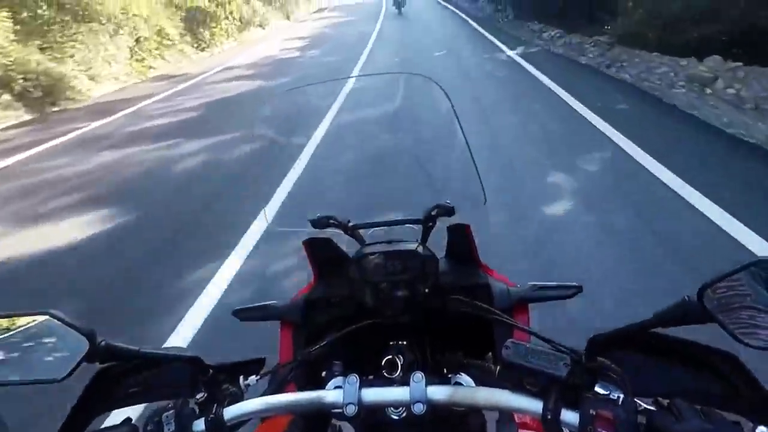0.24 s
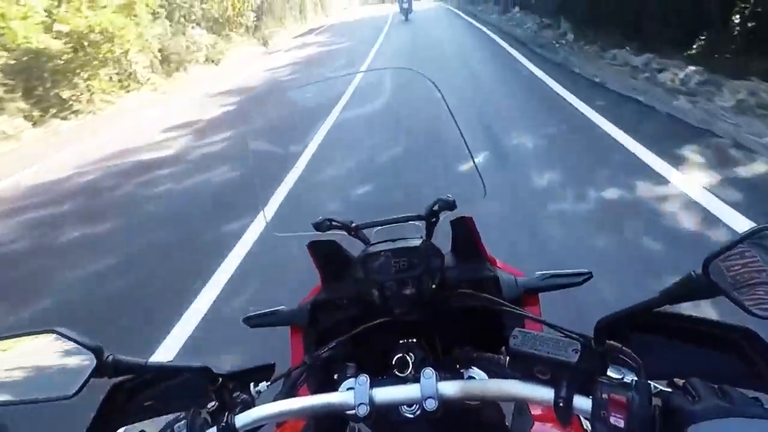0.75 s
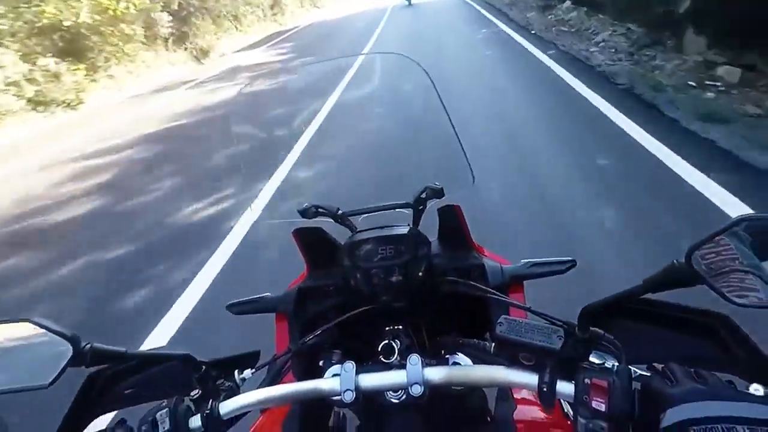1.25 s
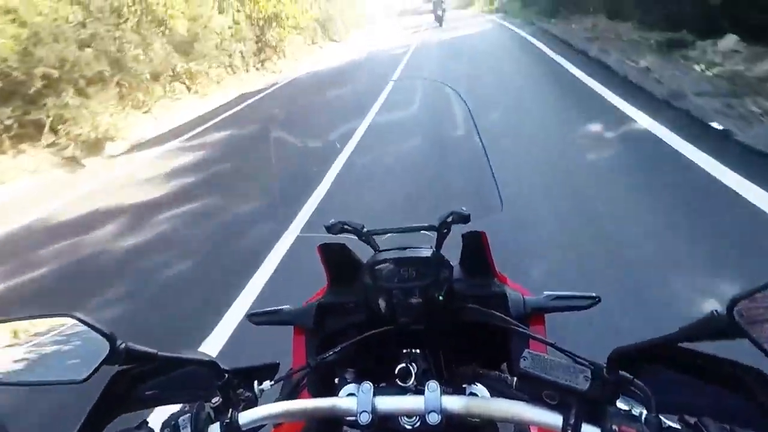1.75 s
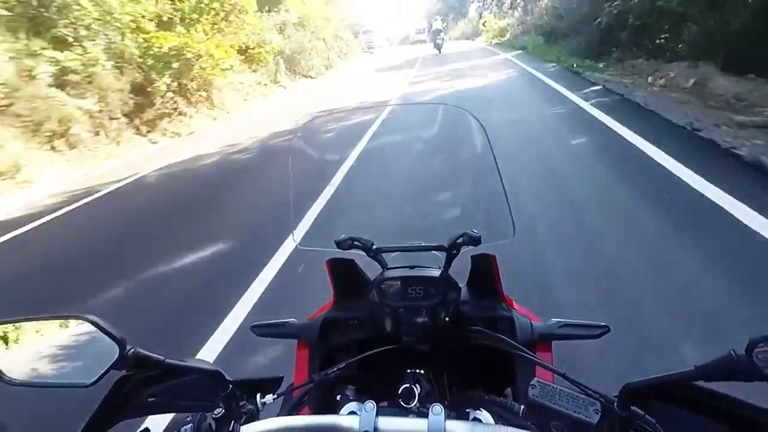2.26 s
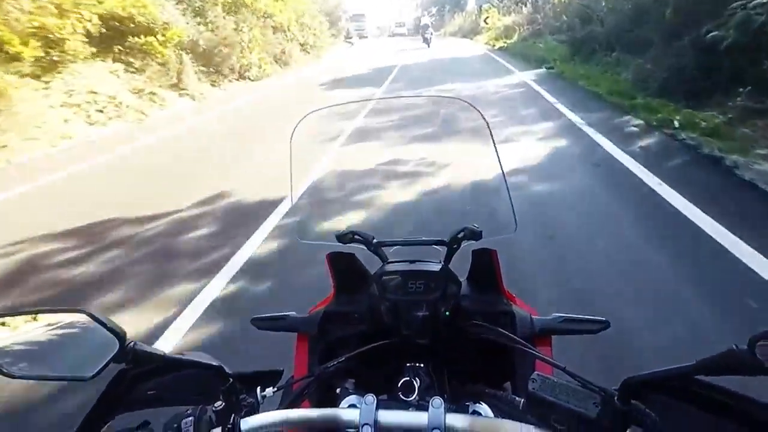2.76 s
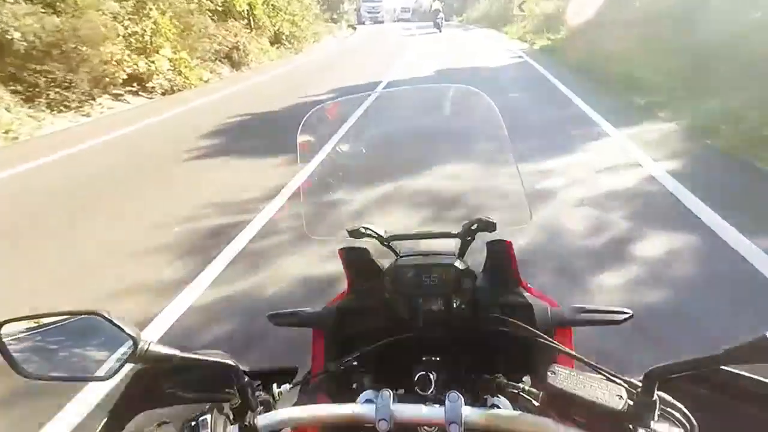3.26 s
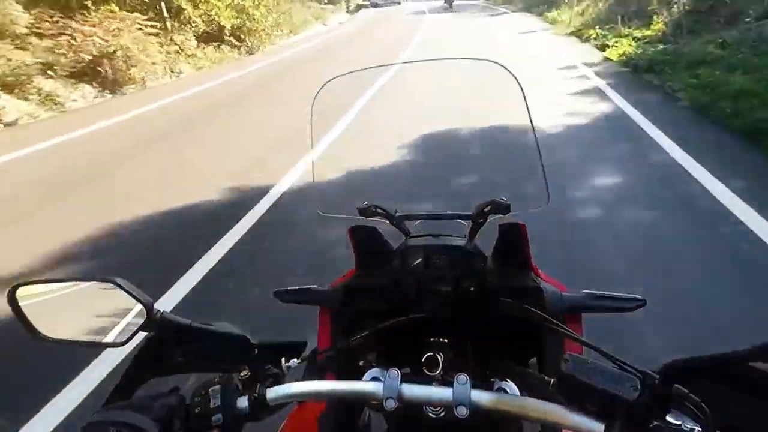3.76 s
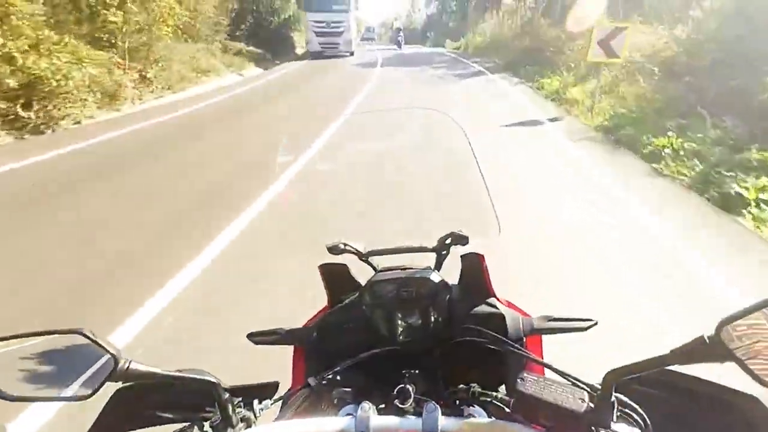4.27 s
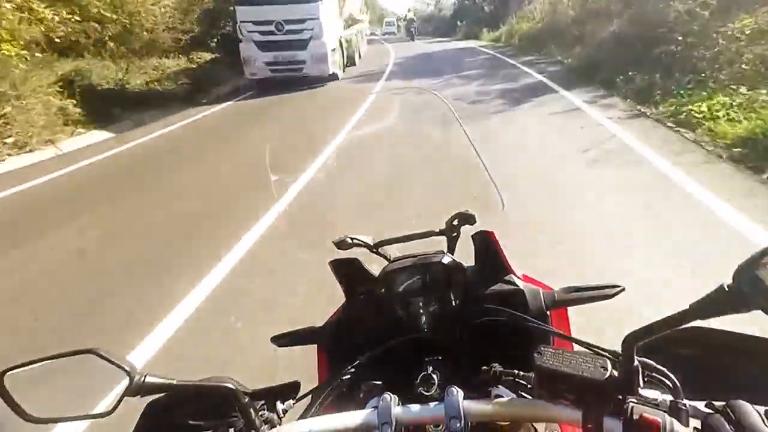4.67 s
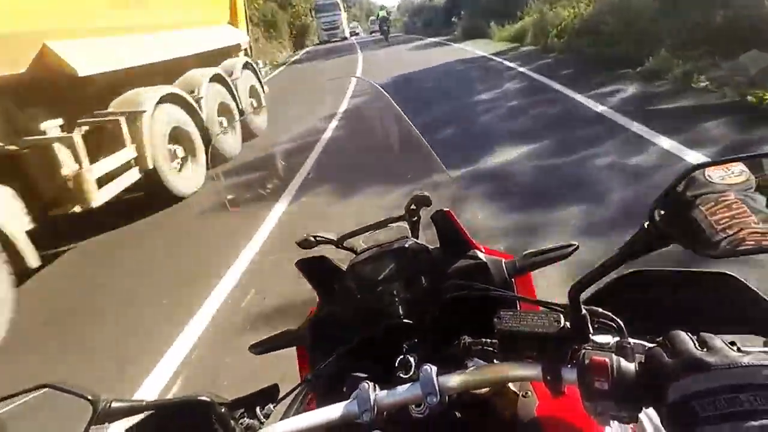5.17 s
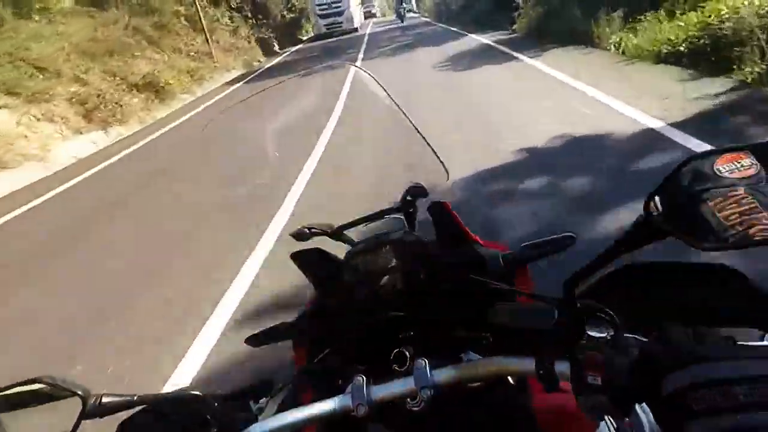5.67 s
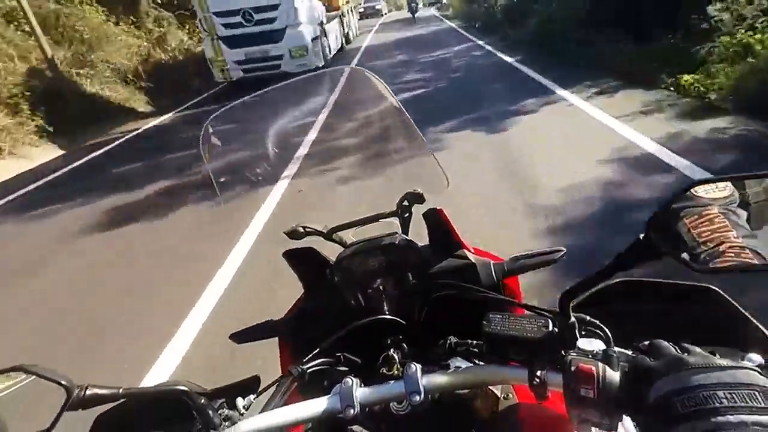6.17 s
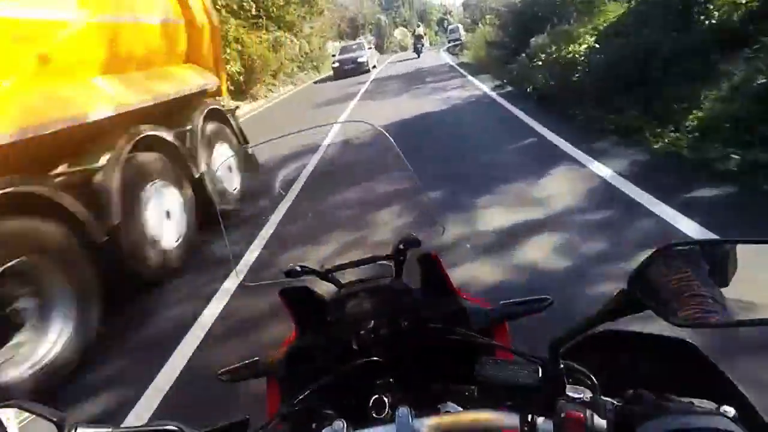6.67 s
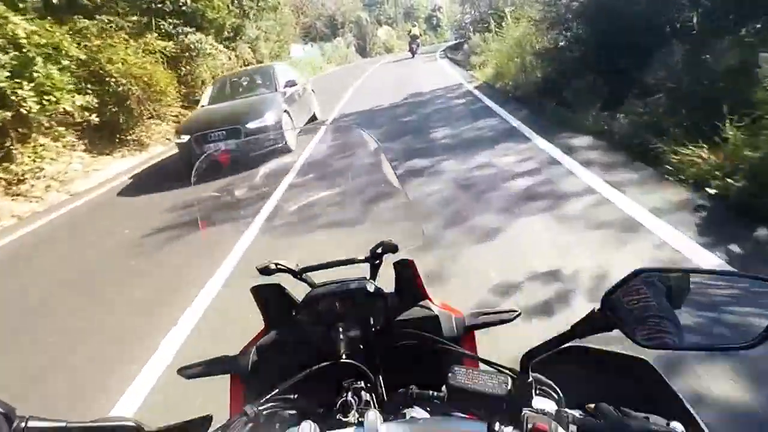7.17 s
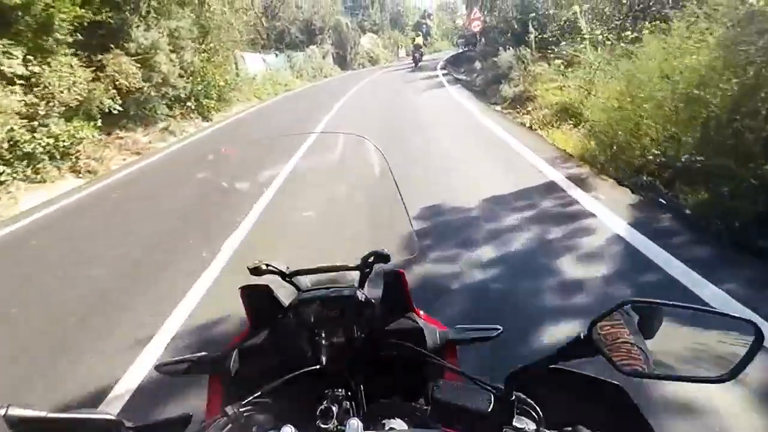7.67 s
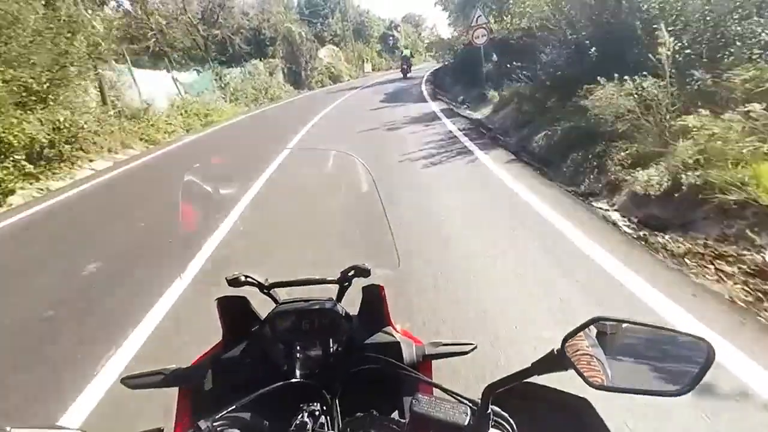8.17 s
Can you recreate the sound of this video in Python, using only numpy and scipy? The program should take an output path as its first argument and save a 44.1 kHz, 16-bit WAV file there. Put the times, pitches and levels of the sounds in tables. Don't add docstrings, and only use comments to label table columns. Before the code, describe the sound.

Low wind buffeting and tyre roar over a lumpy motorcycle engine that accelerates, then eases off as lorries and a car sweep past.

```python
import sys
import numpy as np
from scipy import signal
from scipy.fft import rfft, irfft, next_fast_len
from scipy.io import wavfile
from scipy.ndimage import uniform_filter1d, map_coordinates

SR = 44100
rng = np.random.default_rng(int(sys.argv[2]) if len(sys.argv) > 2 else 0)


def materialize(psi):
    bounded = np.clip(np.atleast_2d(psi).T, -1, 1)
    quanta = np.round(bounded * 32767).astype(np.int16)
    wavfile.write(sys.argv[1], SR, quanta)


def to_linear_factor(level_db):
    exponent = np.asarray(level_db, float) / 20
    return 10 ** exponent


N = 371322


def unit(x):
    return x / np.sqrt(np.mean(x ** 2) + 1e-20)


def along(points, hz):
    f, v = np.transpose(points)
    return np.interp(np.log(hz + 1), np.log(f + 1), v, left=-120, right=-120)


def curves(rows):
    s, *columns = np.transpose(rows)
    return [np.interp(np.arange(N) / SR, s, column) for column in columns]


def wobble(rate, step=1):
    coarse = np.arange(0, N + 32, 32)
    knots = map_coordinates(rng.standard_normal(int(N * rate / SR) + 4), [coarse * rate / SR])
    return np.interp(np.arange(0, N, step), coarse, knots)


def filtered(x, gain):
    m = 2 * next_fast_len(N // 2 + SR // 4)
    cepstrum = irfft(np.log(gain(np.fft.rfftfreq(m, 1 / SR)) + 1e-6), m)
    cepstrum[1:m // 2] *= 2
    cepstrum[m // 2 + 1:] = 0
    return irfft(rfft(x, m) * np.exp(rfft(cepstrum)), m)[..., :N]


def coloured(x, spectrum):
    return unit(filtered(x, lambda hz: to_linear_factor(along(spectrum, hz))))


def patchy(patchy_db):
    z = signal.stft(rng.standard_normal(N + 512), nperseg=512)[2]
    field = uniform_filter1d(rng.standard_normal(z.shape), size=6, axis=0)
    field = uniform_filter1d(field, size=8, axis=1)
    return signal.istft(z * to_linear_factor(patchy_db * unit(field)), nperseg=512)[1][:N]


# (sets in [s], is full [s])
WAKE_S = (4.9, 8)


def swells(rows, lull_db, wake_db):
    step = 64
    t = np.arange(0, N + step, step) / SR
    s, db, half = np.transpose(rows)[:, :, None]
    lull = to_linear_factor(lull_db + wake_db * np.interp(t, WAKE_S, [0, 1]))
    bells = to_linear_factor(db) ** 2 * np.exp(-((t - s) / half) ** 2)
    power = lull ** 2 + bells.sum(0)
    return np.interp(np.arange(N) / SR, t, np.sqrt(power))


# (frequency [Hz], width [Hz], level [dB])
WHINE = (12408, 12, -70)
# (multiple of the cycle, width [Hz], level [dB], cycle rate at onset [Hz], at full [Hz])
GEAR = (170, 40, -54, 27.6, 28.4)


def whine():
    hz, width_hz, db = WHINE
    tone = np.sin(2 * np.pi * hz * np.arange(N) / SR)
    electrics = to_linear_factor(db) * (0.94 + .5 * wobble(width_hz)) * tone
    multiple, width_hz, db, *speeds_hz = GEAR
    cycle_hz = curves(ENGINE)[0]
    mesh = wobble(width_hz) * np.sin(2 * np.pi * multiple * np.cumsum(cycle_hz) / SR)
    return electrics + to_linear_factor(db) * np.interp(cycle_hz, speeds_hz, [0, 1]) * mesh


# (time [s], peak level [dB], half length [s])
LUMPS = [(0.055, -30.2, 0.21), (0.302, -35, 0.073), (1.001, -31, 0.037), (1.179, -31.5, 0.077),
         (1.369, -25, 0.054), (1.631, -28, 0.048), (1.787, -30.5, 0.13), (2.269, -25, 0.065),
         (2.601, -31, 0.16), (2.995, -26, 0.072), (3.452, -33, 0.43), (3.579, -31.5, 0.055),
         (4.36, -27.5, 0.065), (4.567, -27, 0.069), (4.843, -28, 0.17), (5.251, -22.5, 0.09),
         (5.626, -21, 0.088), (5.952, -29, 0.028), (6.135, -29.0, 0.29), (6.696, -23.5, 0.038),
         (6.861, -24.5, 0.26), (7.395, -25.5, 0.13), (7.851, -20.5, 0.16), (8.461, -23, 0.18)]


def frame_lumps():
    return swells(LUMPS, lull_db=-40.5, wake_db=4)


# (time [s], level [dB])
ROAD = [(0, -39.5), (.63, -40), (1.36, -38.5), (2.3, -40.5), (3.33, -38.5), (3.75, -38), (4.48, -35.5),
        (5.3, -32), (5.63, -33), (6.12, -35.5), (6.45, -38), (6.94, -34.5), (7.08, -34.5), (7.2, -37),
        (7.5, -37), (7.9, -36.5), (8.11, -39.5), (8.42, -38.5)]
# (frequency [Hz], density [dB per Hz])
TYRES = [(160, -24), (280, -9), (388, -7), (585, -8.5), (705, -10), (818, -4.5), (1100, -7.5), (1530, -5.5),
         (1790, -4.5), (2600, -14), (3380, -34), (5720, -120)]
CLATTER = [(1500, -35), (2200, -5.5), (3000, -5), (3700, -4.5), (4000, -14), (5000, -12.5), (6500, -22),
           (7500, -12.5), (8500, -24.5), (10000, -27), (13000, -29), (15500, -39)]
BODY = [(80, 0), (120, 1), (170, -5), (250, -8), (300, -16), (400, -41)]


def road(throb, lumps):
    tyre_db, = curves(ROAD)
    throttle = curves(ENGINE)[1]
    clatter_db = tyre_db - 2 + 0.5 * throttle
    shake_db = uniform_filter1d(20 * np.log10(lumps), int(0.41 * SR))
    drum_db = -38 + shake_db - shake_db.mean()
    tyre_level = to_linear_factor(tyre_db - 0.67 + 1.37 * throb + 0.79 * wobble(14))
    tyres = tyre_level * coloured(patchy(patchy_db=0.5), TYRES)
    clatter_level = to_linear_factor(clatter_db + 1.08 * throb + 0.072 * wobble(16))
    clatter = clatter_level * coloured(patchy(patchy_db=0.75), CLATTER)
    drumming = to_linear_factor(drum_db + 0.85 * wobble(5.1)) * coloured(rng.standard_normal(N), BODY)
    return tyres + clatter + drumming


# (time [s], peak level [dB], half length [s])
EDDIES = [(-0.002, -12.5, 0.1), (0.317, -23, 0.11), (0.436, -17.5, 0.037), (0.711, -20.5, 0.096),
          (1.222, -14.5, 0.087), (1.481, -20, 0.25), (1.689, -17.4, 0.041), (1.935, -14, 0.077),
          (2.56, -15.5, 0.024), (2.781, -16, 0.25), (3.035, -15, 0.029), (3.359, -19, 0.027),
          (3.708, -16, 0.21), (3.931, -16.0, 0.053), (4.363, -17, 0.035), (4.576, -13.5, 0.041),
          (4.921, -12.5, 0.15), (5.313, -16.5, 0.048), (5.646, -14.5, 0.077), (5.872, -17, 0.081),
          (6.0, -11.5, 0.034), (6.211, -17.5, 0.309), (6.27, -16, 0.032), (6.557, -15.5, 0.042),
          (6.707, -11.5, 0.025), (6.919, -15, 0.064), (7.073, -13.7, 0.06), (7.203, -11, 0.029),
          (7.466, -18.5, 0.2), (8.048, -15, 0.17)]
# (frequency [Hz], density [dB per Hz])
THUD = [(8, -12.5), (20, -12.5), (30, -6), (41, 1.5), (52, -7.5), (65, -16.5), (85, -30), (120, -57)]
RUMBLE = [(50, -8), (70, 3.5), (100, 1.5), (130, -25.5), (170, -17), (250, -28)]


def buffet(lumps):
    thud = coloured(rng.standard_normal(N), THUD)
    thud = thud / (np.abs(signal.hilbert(thud, next_fast_len(N))[:N]) + .5)
    thud = unit(filtered(thud, lambda hz: 1 / (1 + (hz / 75) ** 4)))
    rumble = unit(to_linear_factor(1.6 * wobble(11)) * coloured(rng.standard_normal(N), RUMBLE))
    eddies = swells(EDDIES, lull_db=-26, wake_db=2.5)
    return to_linear_factor(0.64) * eddies * thud + to_linear_factor(0.4) * lumps * rumble


# (time [s], peak level [dB], half length [s])
GUSTS = [(-0.1, -26, 0.096), (0.248, -32, 0.023), (0.333, -29.5, 0.017), (1.21, -35, 0.041),
         (1.839, -34.5, 0.02), (2.25, -37.5, 0.04), (2.604, -32.5, 0.022), (2.705, -31, 0.031),
         (3.025, -34.5, 0.044), (3.692, -36, 0.014), (4.19, -41.5, 0.187), (4.351, -32, 0.027),
         (4.917, -32, 0.19), (5.269, -31, 0.069), (5.611, -30.7, 0.096), (5.936, -32, 0.019),
         (5.984, -38, 0.018), (6.018, -31.5, 0.62), (6.075, -28, 0.015), (6.333, -48, 0.056),
         (6.535, -38, 0.0095), (6.741, -19, 0.011), (6.9, -31.5, 0.03), (7.061, -22, 0.12),
         (7.121, -19.5, 0.018), (7.297, -25, 0.081), (7.636, -28, 0.059), (7.936, -26, 0.17),
         (8.331, -28.5, 0.02), (8.404, -32, 0.015)]
# (time [s], peak level
# [dB])
BURSTS = [(0.3292, -19), (1.1742, -18), (1.3134, -20.5), (1.3554, -20.5), (1.8143, -20), (2.2052, -19),
          (2.602, -21), (2.9103, -19), (3.016, -22), (3.0719, -19.5), (3.6875, -18.5), (3.7414, -23),
          (4.152, -20.5), (4.1909, -20.5), (4.35, -16), (4.5072, -16.5), (4.5461, -22), (4.6641, -20),
          (4.7873, -15.5), (4.832, -11.5), (4.907, -13.5), (4.9451, -13), (5.0373, -15),
                  (5.278, -14.5), (5.3655, -18), (5.5429, -14), (5.8488, -15.5), (5.9112, -11.5),
                  (5.955, -12), (5.9825, -3), (6.0059, -13), (6.144, -13), (6.1879, -14), (6.3128, -12),
                  (6.3571, -14), (6.4856, -17.5), (6.533, -10.5), (6.7367, -8), (6.7801, -14),
                  (6.831, -18.5), (6.8657, -14),
          (6.8657, -14.5), (6.9368, -10), (6.9646, -13), (7.0458, -9.5), (7.0965, -10), (7.1756, -9),
               (7.1985, -11.5), (7.2444, -10.5), (7.2633, -8.5), (7.3153, -12.5), (7.347, -9.5),
               (7.4074, -18), (7.4974, -14), (7.558, -15), (7.6242, -15), (7.642, -11), (7.7068, -18.5),
               (7.7428, -11.5), (7.893, -13), (7.9498, -9.5), (8.0306, -13), (8.1346, -18.5),
               (8.197, -14.5), (8.2606, -19), (8.2893, -17), (8.318, -11), (8.3332, -7.5), (8.3968, -15)]
# (frequency [Hz], density [dB per Hz])
HISS = [(250, -16), (400, -11), (900, -10.5), (1500, -12.5), (2200, -9.5), (3300, -1), (3750, -2.5),
        (4050, -19), (5000, -23.5), (6500, -25), (8500, -30.5), (12000, -39), (15500, -60)]


def gusts():
    gust = swells(GUSTS, lull_db=-39.5, wake_db=1.5)
    broken = np.clip((20 * np.log10(gust) + 58.0) / 14, .2, 1.1)
    ragged_db = 1.4 * wobble(14) + 1.6 * wobble(45) + 2.2 * wobble(150)
    flutter = to_linear_factor(broken * ragged_db)
    level = to_linear_factor(-0.56) * gust * flutter / np.sqrt(uniform_filter1d(flutter ** 2, size=SR // 6))
    rise_s, fall_s, lead_s, trim_db = .0018, .007, .001, -5.5
    t = np.arange(SR // 20) / SR
    burst = (1 - np.exp(-t / rise_s)) * np.exp(-t / fall_s)
    power = np.pad(level ** 2, (0, len(t)))
    for s, db in BURSTS:
        start = round((s - lead_s) * SR)
        power[start:][:len(t)] += (to_linear_factor(db + trim_db) * burst) ** 2
    air = np.sqrt(power[:N]) * unit(patchy(patchy_db=1))
    return np.sqrt(np.mean(air ** 2)) * coloured(air, HISS)


# (time [s], four-stroke cycle rate [Hz], throttle [0-1], level [dB])
ENGINE = [(0, 24.4, .33, 0), (.2, 24.15, .33, 0), (.84, 24.1, .33, 0), (2, 23.6, .33, 0),
          (2.77, 23.5, .35, 0), (3.37, 23.7, .55, 0), (3.8, 24.2, .67, 0), (4.13, 24.8, .75, 0),
          (4.78, 26.5, .95, 0), (5.3, 27.8, 1, 0), (5.79, 28.95, 1, 0), (5.93, 28.95, 1, 0),
          (5.98, 28.9, 0, 1), (6.4, 28.7, 0, 1), (6.75, 28, 0, 0), (7.1, 26.9, 0, -6), (7.55, 26.45, 0, 0),
          (8.42, 26.1, 0, 0)]
TWIN = (.375, .8)
# (multiple of the cycle, rms with
# throttle shut [dB], cruising [dB], opening [dB], wide [dB])
EXHAUST = [(3, -42, -43, -42, -38), (4, -44, -42, -44, -46), (5, -37, -35, -35, -32),
           (6, -39, -39.5, -38, -34), (7, -46, -56, -51, -47), (8, -40, -40, -42, -39),
           (9, -48, -43, -46, -40), (10, -58, -45, -44, -57), (11, -53, -45, -38, -55)]
INTAKE = [(12, -62, -61, -55, -56), (13, -60, -63, -61, -53), (14, -58, -55, -58, -48),
          (15, -57, -61, -59, -54), (16, -58, -63, -57, -48), (17, -58, -63, -55, -48),
          (18, -60, -63, -58, -50), (19, -57, -54, -48, -47), (20, -60, -60, -58, -47),
          (21, -59, -56, -54, -44), (22, -60, -67, -55, -43), (23, -58, -66, -52, -50),
          (24, -59, -52, -47, -55), (25.5, -64, -54, -55, -60), (27, -66, -66, -61, -60),
          (30, -66, -66, -62, -56), (32, -66, -64, -60, -55)]
# (frequency [Hz], gain [dB])
AIR_BOX = [(50, 0), (300, 0), (380, -1.5), (520, -1), (580, 1), (610, -4), (640, -10), (720, -3),
           (1200, -3)]


def engine():
    step = 16
    cycle_hz, throttle, level_db = [c[::step] for c in curves(ENGINE)]
    turns = np.cumsum(cycle_hz) * step / SR
    delay, size = TWIN
    total = np.zeros(len(turns))
    for k, *states_db in EXHAUST + INTAKE:
        second = size if k < 12 else size / 3
        phase = np.angle(1 + second * np.exp(-2j * np.pi * k * delay)) + .2 * wobble(5, step)
        phase += rng.normal(0, .6) - .01 * np.pi * k ** 2
        partial_db = np.interp(throttle, np.linspace(0, 1, 4), states_db) + 1.5 * wobble(6, step)
        partial_db = partial_db + along(AIR_BOX, k * cycle_hz) + level_db - .3
        total += to_linear_factor(partial_db) * np.sqrt(2) * np.sin(2 * np.pi * k * turns + phase)
    angle = 2 * np.pi * turns
    throb = np.cos(angle) + .6 * np.cos(3 * angle) + .5 * np.cos(5 * angle)
    return signal.resample_poly([total, throb], step, 1, axis=1)[:, :N]


def scene():
    motor, throb = engine()
    lumps = frame_lumps()
    return (whine() + road(throb, lumps) + buffet(lumps) + gusts() + motor)[None]


# (frequency [Hz], width [Hz], lift [dB])
HOUSING = [(1790, 185, 7), (3400, 250, 2.5), (4660, 130, 3), (7660, 920, -1.5)]


def housing(dry):
    def gain(hz):
        return to_linear_factor(sum(db / (1 + (2 * (hz - c) / w) ** 2) for c, w, db in HOUSING))
    return filtered(dry, gain)


def band_limit(x):
    return signal.sosfilt(signal.butter(12, 15300, fs=SR, output="sos"), x)


def record(dry):
    housed = housing(dry)
    mix = housed / (1 + np.abs(housed / .95) ** 6) ** (1 / 6)
    return band_limit(mix)


dry = scene()
out = record(dry)
materialize(out)
```